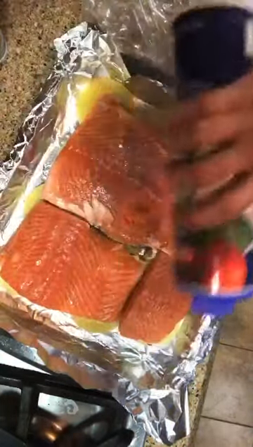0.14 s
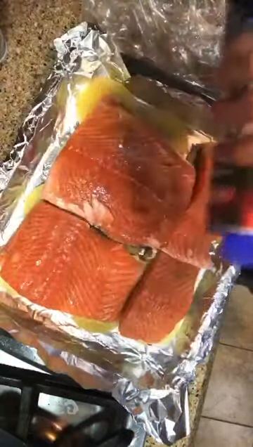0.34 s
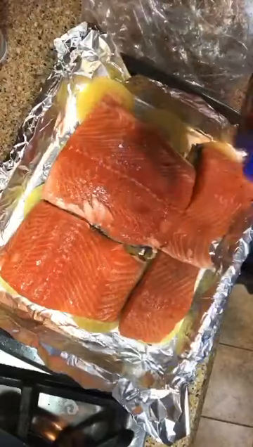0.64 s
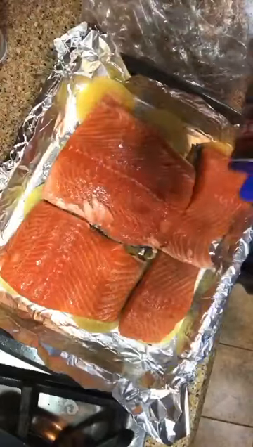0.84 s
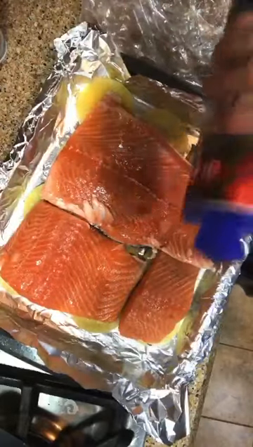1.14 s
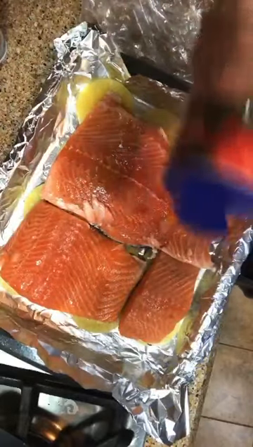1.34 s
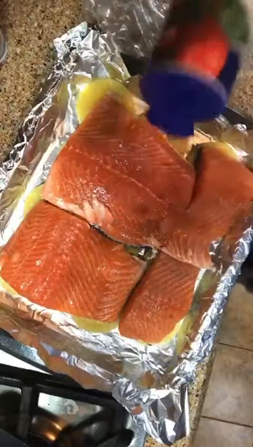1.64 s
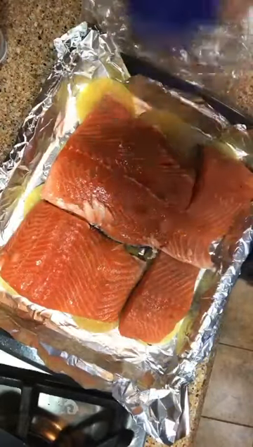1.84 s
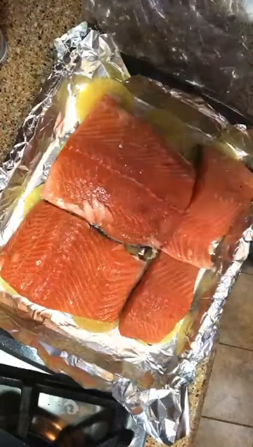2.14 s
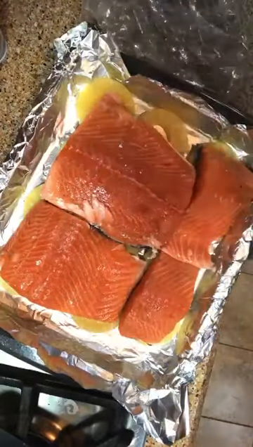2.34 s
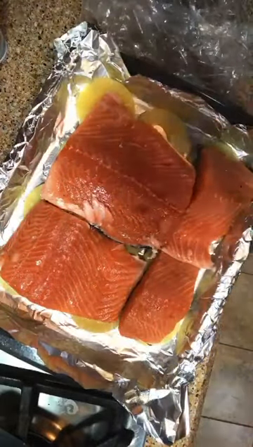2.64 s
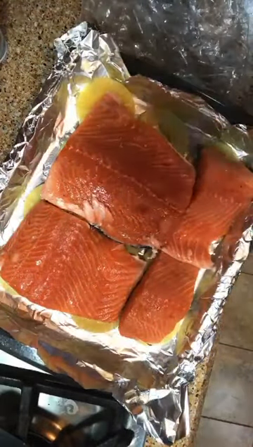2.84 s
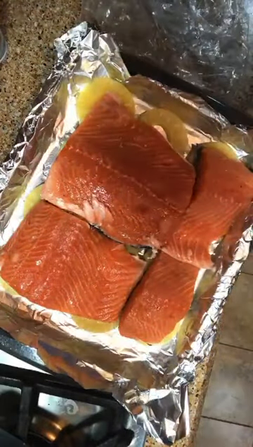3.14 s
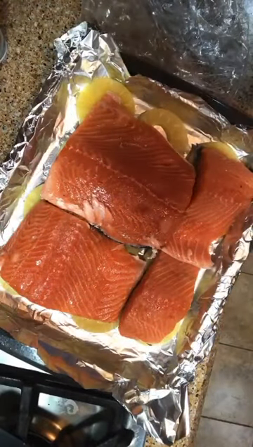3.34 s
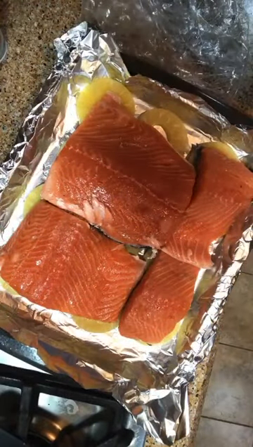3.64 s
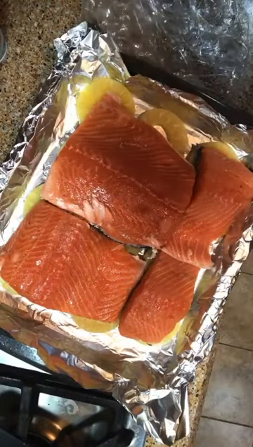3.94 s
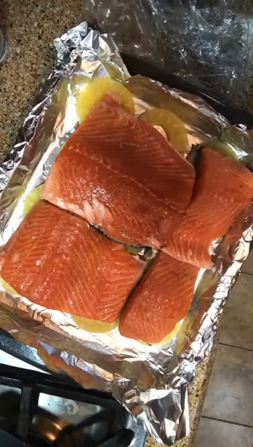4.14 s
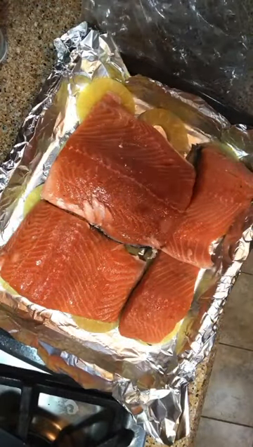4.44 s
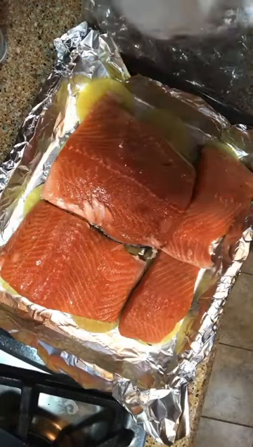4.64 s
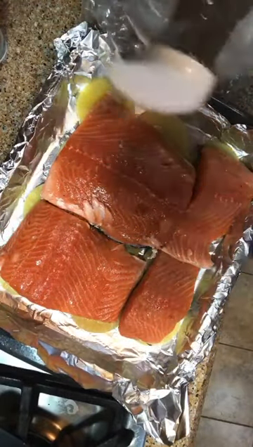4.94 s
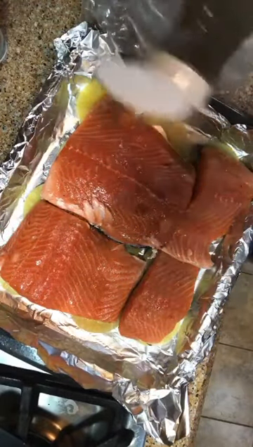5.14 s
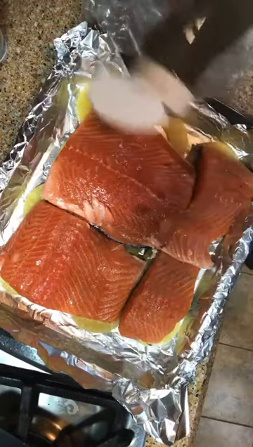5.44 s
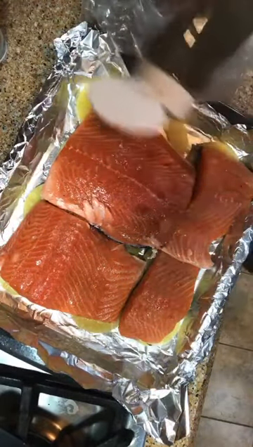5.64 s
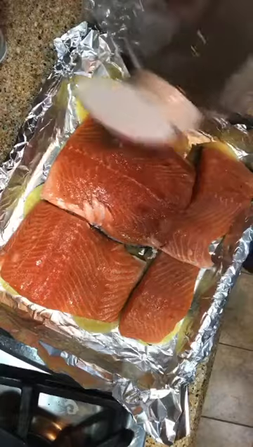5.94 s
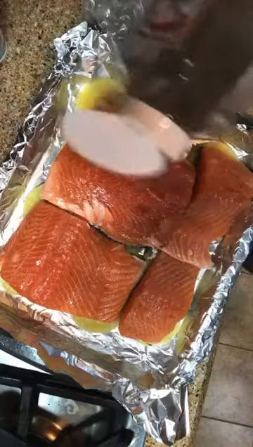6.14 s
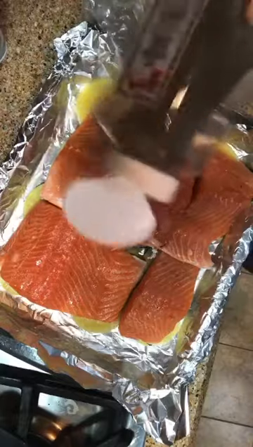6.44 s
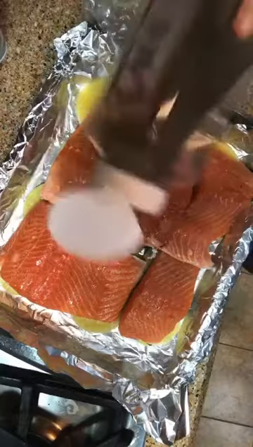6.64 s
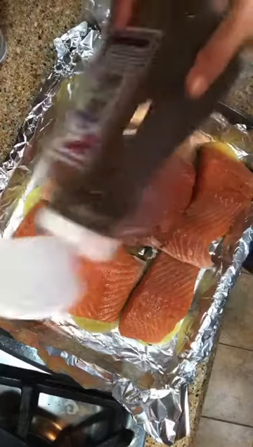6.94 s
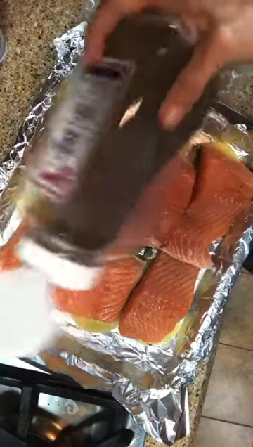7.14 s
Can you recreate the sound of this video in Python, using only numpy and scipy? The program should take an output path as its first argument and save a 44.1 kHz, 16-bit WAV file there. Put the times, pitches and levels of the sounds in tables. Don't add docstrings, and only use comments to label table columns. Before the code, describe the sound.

A nearby phone microphone catches quick, bright salt swishes in pairs for about two seconds, then a hard hollow knock as the tube lands on stone. A box bumps, a metal clip clicks and glass jars clatter with a short ring stilled by a hand. Quiet pepper rustling and light plastic lid flaps follow, then a crisp shake, over fridge hum and half-second tile reverberation.

```python
import sys
import numpy as np
from scipy import signal
from scipy.fft import rfft, irfft, next_fast_len
from scipy.io import wavfile
from scipy.ndimage import uniform_filter1d, map_coordinates

SR = 44100
rng = np.random.default_rng(int(sys.argv[2]) if len(sys.argv) > 2 else 0)


def ratio_of_db(decibels):
    return 10 ** (np.asarray(decibels, float) / 20)


def log_audio(samples):
    frames = np.atleast_2d(samples).T
    limited = np.clip(frames, -1, 1)
    pcm = np.round(limited * 32767).astype(np.int16)
    wavfile.write(sys.argv[1], SR, pcm)


N = 321489

# peak_s, level_db, half_length_s
SALT_THROWS = [(0.067, -53, 0.082), (0.146, -50.5, 0.073), (0.284, -56.5, 0.081), (0.355, -53, 0.089),
               (0.567, -55, 0.077), (0.726, -54, 0.073), (0.808, -52, 0.086), (1.005, -53.5, 0.071),
               (1.146, -60, 0.078), (1.219, -52, 0.089), (1.397, -57, 0.088), (1.475, -50, 0.074),
               (1.623, -56.5, 0.098), (1.705, -51.5, 0.077), (2.099, -55.5, 0.13)]
# peak_s, level_db, rise_s, fall_s
SALT_JOLT = [
    (0.453, -52.5, .006, 0.15),
]
# peak_s, level_db, rise_s, fall_s, fine_crystals_db
SALT_SLIDES = [
    (0.965, -57.5, .17, .17, -0.5),
    (1.53, -67.5, 0.15, 0.24, -3),
    (2.42, -65, .2, .35, -2.5),
    (2.25, -71, 0.089, 0.31, 4),
]
# peak_s, level_db, rise_s, fall_s
PEPPER_THROWS = [(3.45, -63.5, 0.0082, .1), (3.526, -57, 0.058, .1), (3.572, -52.5, 0.045, 0.13),
                 (5.116, -55.5, .04, 0.096), (5.566, -62, .012, .15), (6.736, -47, .005, .05),
                 (6.755, -45, 0.027, 0.04), (6.79, -57, .03, 0.097), (7.29, -68, .05, .05)]
# peak_s, level_db, rise_s, fall_s, fine_grains_db
PEPPER_SLIDES = [(4.2, -61, 0.22, .2, 0), (4.26, -65.5, 0.11, 0.13, 2), (4.62, -63.5, 0.24, 0.25, -4.5),
                 (4.75, -63.5, 0.28, 0.12, 1.5), (4.87, -70, 0.1, 0.17, 3), (5.02, -65.5, 0.038, 0.4, 0.5),
                 (5.2, -69.5, 0.22, 0.24, 2.5), (5.43, -75, 0.064, 0.18, 2), (5.64, -70.5, 0.12, 0.13, -8),
                 (5.75, -70, .03, 0.095, 4.5), (5.83, -63, 0.22, 0.18, -2.5), (6.08, -79, 0.18, 0.079, 1.5),
                 (6.28, -76, .1, .1, 1.5), (6.63, -75, .1, .1, 1.5), (5.57, -68, .01, .06, -8),
                 (6.4, -60.5, 0.071, 0.12, -4), (6.475, -63, 0.045, 0.15, -1),
                 (6.93, -65.5, 0.14, 0.16, -6), (7.03, -69, 0.12, 0.15, 0), (7.2, -74.5, 0.26, .2, -4)]
# frequency_hz, density_db_per_hz
SALT_HISS = [(3000, -19.5), (5000, -8), (6500, -3.5), (8500, -6.5), (10500, -4), (12500, -5.5), (14100, -6),
             (15300, -4), (16000, -37)]
# frequency_hz, density_db_per_hz
PEPPER_HISS = [(3000, -31), (5000, -4), (6300, -4), (8000, -3), (10400, -0.5), (12500, -6), (15000, -2.5),
               (16000, -9)]
# frequency_hz, density_db_per_hz
WALL_RUB = [(500, -10.5), (1000, -1.5), (1700, 1), (2500, -2), (4000, -25)]
# frequency_hz, density_db_per_hz
COARSE_GRAINS = [(1600, -31), (2700, -4), (3600, -2.5), (5000, -7.5), (7500, -17)]
# pitch_hz, width_hz, level_db
SALT_CAP = [(4270, 930, -2.5), (6500, 500, 0), (13900, 1000, -1)]
# pitch_hz, width_hz, level_db
PEPPER_CAP = [(2880, 180, -11), (5230, 130, 1.5), (6550, 69, -4.5), (7800, 180, -2), (11270, 900, -4),
              (14100, 300, 1)]
# start_s, peak_db, length_s, cap_pitch_hz, cap_level_db
CAP_TICKS = [(0.2872, -33, 0.0086, 14200, 11), (0.361, -40, 0.013, 6520, -7), (0.45, -40, 0.016, 12900, 6),
             (0.453, -49, 0.012, 14800, 0), (0.4662, -42, 0.012, 13800, 3), (0.4986, -35, 0.008, 6450, -6),
             (0.45, -44.5, 0.012, 3100, 8), (0.501, -52, 0.015, 3300, 8), (6.7335, -52, 0.01, 2970, 12),
             (0.954, -38, 0.014, 14500, 0.5), (5.1103, -44, 0.026, 5250, -10),
             (5.567, -55, 0.03, 13800, 10), (6.733, -33, 0.011, 6550, -10),
             (6.7444, -36, 0.017, 11500, 6.5)]

# start_s, peak_db, crack_db
TUBE_DOWN = [
    (2.433, -12.5, 0),
]
BOX_NUDGE = [
    (3.171, -24.5, -28),
    (3.175, -23, -21),
    (3.219, -38, -13),
    (3.268, -51, -22),
]
SPRING_CLICK = [
    (3.26, -45.5, 6.1),
]
JAR_TOUCH = [
    (3.444, -32.5, -22),
    (3.449, -25.5, -8),
]
JAR_CLINK = [
    (3.604, -15, -22),
    (3.607, -21, -28),
    (3.636, -20.5, -32),
    (3.67, -13.5, -17),
    (3.711, -18, -18),
]
LID_FLAP = [(4.157, -46.5, -26), (4.377, -45, -30), (4.386, -38, -30), (4.406, -43, -30), (4.549, -40, -30),
            (4.557, -41, -30), (4.576, -42, -30)]
LID_SWING = [
    (6.472, -46, -26),
    (6.479, -40, -30),
]

# pitch_hz, width_hz, level_db
TUBE_BODY = [(252, 72, -5.5), (352, 52, 1), (740, 160, -5), (1010, 150, 1.5), (1780, 350, -11.5)]
BOX_BODY = [(362, 23, 1.5), (746, 156, -7), (1354, 180, -5), (1900, 320, -8.5), (2450, 620, -16.5),
            (5240, 40, -20)]
SPRING_BODY = [(4230, 190, 5), (5400, 270, -9)]
JAR_BASE = [(354, 31, 0), (520, 72, -3.5), (960, 380, -8), (1400, 260, -5), (2030, 360, -8.5),
            (2650, 850, -21)]
JAR_BODY = [(333, 62, -10.5), (537, 42, -10.5), (735, 130, -9.5), (1080, 560, -7), (1474, 300, -2.5),
            (2125, 186, -9), (2970, 540, -16.5)]
LID_BODY = [(814, 130, -6), (1010, 170, 4.5), (1500, 260, -6), (2050, 300, -9)]
LID_HANGING = [(870, 160, 6), (1080, 200, -1.5), (1750, 600, -6)]
HARD_EDGE = [(2800, 1960, 7), (7000, 2500, -10.5), (13000, 5000, -23)]

# start_s, level_db, upper_modes_db
GLASS_RINGS = [
    (3.448, -44.5, -5.5),
    (3.604, -31, -9),
    (3.67, -35.5, -7),
    (3.711, -40, -7.5),
]
# pitch_hz, level_db, t60_s
GLASS_MODES = [(756.4, -6.5, 0.41), (955, -15.5, 0.56), (1120, -7.5, 0.42), (1296, -5, 0.54),
               (1513, -11, 0.56), (1619, -1.5, 0.62), (1628, -6.5, 0.52), (3710, -3, 0.4),
               (3760, -12, 0.52), (6620, -26, 0.29)]
# start_s, peak_db, pitch_hz, t60_s
METAL_PINGS = [
    (3.175, -61, 5216, .13),
    (3.176, -63, 4118, .2),
    (3.26, -64, 4300, .2),
    (3.449, -63, 5911, 0.18),
]
# start_s, peak_db, pitch_hz, t60_s
COUNTER_THUDS = [(2.4345, -15, 180, 0.06), (2.4345, -20, 245, 0.06), (2.458, -28, 170, .08),
                 (2.555, -33, 180, .08), (2.51, -24.5, 179, 0.045), (3.215, -38.5, 132, 0.049),
                 (3.266, -34, 133, 0.086), (3.45, -29, 197, 0.08), (3.487, -44, 168, 0.11),
                 (3.536, -40.5, 135, 0.065), (3.611, -31.5, 151, 0.091), (3.675, -32.5, 162, 0.1),
                 (3.72, -37, 138, 0.064), (2.436, -31.5, 100, 0.19)]
# frequency_hz, t60_s
ROOM_DECAY = [(100, 0.51), (400, 0.48), (1500, 0.56), (5000, 0.52), (12000, 0.51)]
# pitch_hz, level_db_rms
FRIDGE_HUM = [(32, -67.5), (60, -69.5), (120, -63), (240, -77), (752, -78), (960, -79.5)]
# frequency_hz, density_db_per_hz
ROOM_TONE = [(20, -3.5), (63, -2.5), (85, -11), (125, -12.5), (170, -16), (300, -16), (450, -19.5),
             (760, -21), (2000, -26.5), (4000, -33), (8000, -38.5), (10500, -41.5), (13500, -39),
             (16000, -44)]
# frequency_hz, level_db
MIC_COLOUR = [(9000, 0), (10400, -5), (11800, -1.5)]


def unit(x):
    return x / np.sqrt(np.mean(x ** 2) + 1e-20)


def along(points, hz):
    f, value = np.transpose(points)
    return np.interp(np.log(hz + 1), np.log(f + 1), value)


def wobble(rate_hz):
    at = np.arange(0, N + 32, 32)
    knots = rng.standard_normal(int(N * rate_hz / SR) + 4)
    return np.interp(np.arange(N), at, map_coordinates(knots, [at * rate_hz / SR]))


def filtered(x, response):
    size = next_fast_len(len(x) + 8192)
    spectrum = rfft(x, size) * response(np.fft.rfftfreq(size, 1 / SR))
    return irfft(spectrum, size)[:len(x)]


def coloured(x, spectrum):
    return unit(filtered(x, lambda hz: ratio_of_db(along(spectrum, hz))))


def body(x, modes):
    def response(f):
        total = 0
        for k, (hz, width, db) in enumerate(modes):
            damping = 1j * f * width
            total = total + (-1) ** k * ratio_of_db(db) * damping / (hz * hz - f * f + damping)
        return total
    return filtered(x, response)


def room(x, early_db, wet_db, direct_db=0.0):
    hz, t, z = signal.stft(rng.standard_normal(SR // 2 + SR // 8), SR, nperseg=256)
    decay = ratio_of_db(-60 * t / along(ROOM_DECAY, hz)[:, None])
    tail = signal.istft(z * decay, SR, nperseg=256)[1]
    t = np.arange(len(tail)) / SR
    tail = tail * (1 - np.exp(-t / 0.012))
    early = rng.standard_normal(len(t)) * ratio_of_db(-60 * t / 0.045) * (1 - np.exp(-t / 0.0011))
    echoes = ratio_of_db(early_db) * early / np.linalg.norm(early) + ratio_of_db(wet_db) * tail / np.linalg.norm(tail)
    return ratio_of_db(direct_db) * x + signal.fftconvolve(x, echoes)[:len(x)]


def add(track, s, x):
    part = track[round(s * SR):][:len(x)]
    part += x[:len(part)]


def shaking():
    rise_share = 0.48
    throws = [(s, db, rise_share * 2 * half, (1 - rise_share) * 2 * half) for s, db, half in SALT_THROWS]
    salt = powder(throws + SALT_JOLT, SALT_SLIDES, SALT_HISS, SALT_CAP, clump_db=0.5, patchy_db=2.0,
                  cap_db=-10.5, wall_db=[-16, 1.5], coarse_db=[-10.5, 0.5])
    pepper = powder(PEPPER_THROWS, PEPPER_SLIDES, PEPPER_HISS, PEPPER_CAP, clump_db=-0.5, patchy_db=2.5,
                    cap_db=-1.5, wall_db=[-17, 2.5], coarse_db=[-9, 1.5])
    return salt + pepper


def powder(throws, slides, hiss, cap, clump_db, patchy_db, cap_db, wall_db, coarse_db):
    grains = rng.standard_normal((3, N)) * ratio_of_db(1.5 * rng.standard_exponential((3, N)))
    z = signal.stft(grains * ratio_of_db(clump_db * wobble(150)), nperseg=256)[2]
    patches = uniform_filter1d(rng.standard_normal(z.shape), size=9, axis=1)
    patches = uniform_filter1d(patches, size=8, axis=2)
    grains = signal.istft(z * ratio_of_db(patchy_db * unit(patches)), nperseg=256)[1][:, :N]
    fine = coloured(grains[0], hiss)
    wall = coloured(grains[1], WALL_RUB)
    coarse = coloured(grains[2], COARSE_GRAINS)

    thrown = strokes(throws)
    slid = strokes([row[:-1] for row in slides])
    sifted = strokes([(s, db + fine_db, rise, fall) for s, db, rise, fall, fine_db in slides])

    def level(share_db):
        return np.sqrt(ratio_of_db(2 * share_db[0]) * thrown + ratio_of_db(2 * share_db[1]) * slid)

    ringing = ratio_of_db(cap_db) * np.sqrt(thrown) * unit(body(grains[0] + grains[1], cap))
    return np.sqrt(thrown + sifted) * fine + ringing + level(wall_db) * wall + level(coarse_db) * coarse


def strokes(rows):
    pointed = 1.19
    t = np.arange(0, N / SR + .002, .001)
    s, db, rise, fall = np.transpose(rows)[..., None]
    away = np.abs(t - s) / np.maximum(np.where(t < s, rise, fall), .002)
    power = np.sum(ratio_of_db(db - 20 * away ** pointed) ** 2, axis=0)
    return np.interp(np.arange(N) / SR, t, power)


def ticks():
    out, t = np.zeros(N), np.arange(SR // 10) / SR
    for s, db, length, hz, cap_db in CAP_TICKS:
        burst = coloured(rng.standard_normal(len(t)), SALT_HISS)
        burst += ratio_of_db(cap_db) * unit(body(rng.standard_normal(len(t)), [(hz, 0.18 * hz, 0)]))
        envelope = ratio_of_db(db - 1.5 - 60 * t / max(length, .002)) * (1 - np.exp(-t / 0.0012))
        add(out, s, envelope * burst)
    return out


def knocks(events, modes, contact_s, direct_db, early_db, wet_db):
    out, t = np.zeros(N), np.arange(SR // 2 + SR // 8) / SR
    push = np.exp(-((t - 3 * contact_s) / contact_s) ** 2)
    shell = body(push, modes)
    shell = shell / np.abs(shell).max()
    crack = body(1.0 * (t == 0), HARD_EDGE)
    crack = crack / np.abs(crack).max()
    for s, db, crack_db in events:
        add(out, s, ratio_of_db(db) * room(shell + ratio_of_db(crack_db) * crack, early_db, wet_db, direct_db))
    return out


def objects():
    hits = knocks(TUBE_DOWN, TUBE_BODY, contact_s=.0001, direct_db=-2, early_db=-1.0, wet_db=-3.5)
    hits += knocks(BOX_NUDGE, BOX_BODY, contact_s=.00006, direct_db=-9.5, early_db=2.5, wet_db=-0.5)
    hits += knocks(SPRING_CLICK, SPRING_BODY, contact_s=.00003, direct_db=-2.0, early_db=2.5, wet_db=-5.0)
    hits += knocks(JAR_TOUCH, JAR_BASE, contact_s=.00008, direct_db=-3, early_db=1.5, wet_db=-1.0)
    hits += knocks(JAR_CLINK, JAR_BODY, contact_s=.00008, direct_db=-3.5, early_db=-1.0, wet_db=-2.5)
    hits += knocks(LID_FLAP, LID_BODY, contact_s=.00013, direct_db=-6, early_db=-2.5, wet_db=0.0)
    hits += knocks(LID_SWING, LID_HANGING, contact_s=.00013, direct_db=-5, early_db=-2.5, wet_db=-1.5)
    return hits


def glass():
    grip_s, grip_t60_s = 3.79, .15
    out, t = np.zeros(N), np.arange(SR) / SR
    for s, db, upper_db in GLASS_RINGS:
        upper = upper_db - 60 * np.maximum(s + t - grip_s, 0) / grip_t60_s
        ring = np.zeros(len(t))
        for hz, level, t60 in GLASS_MODES:
            fade_db = level + upper * (hz > 3000) - 60 * t / t60
            ring += ratio_of_db(fade_db) * np.sin(2 * np.pi * hz * t)
        add(out, s, ratio_of_db(db) * (1 - np.exp(-t / 0.0029)) * ring)
    return out


def pings():
    out, t = np.zeros(N), np.arange(SR // 2) / SR
    for s, db, hz, t60 in METAL_PINGS:
        add(out, s, ratio_of_db(db - 60 * t / t60) * (1 - np.exp(-t / 0.0023)) * np.sin(2 * np.pi * hz * t))
    return out


def counter():
    out, t = np.zeros(N), np.arange(SR // 2) / SR
    for s, db, hz, t60 in COUNTER_THUDS:
        swing = ratio_of_db(db - 60 * t / t60) * (1 - np.exp(-t / 0.00087)) * np.sin(2 * np.pi * hz * t)
        add(out, s, room(swing, early_db=-7.5, wet_db=-8.5))
    return out


def kitchen():
    t, hum = np.arange(N) / SR, np.zeros(N)
    for hz, db in FRIDGE_HUM:
        level = ratio_of_db(db + 3 + 1.5 * wobble(8))
        hum += level * np.sin(2 * np.pi * hz * t + .3 * wobble(3))
    air_db = -56.5 - 3.0 + .6 * wobble(3)
    return hum + ratio_of_db(air_db) * coloured(rng.standard_normal(N), ROOM_TONE)


def scene():
    powders = shaking() + room(ticks(), early_db=-5, wet_db=-7)
    mix = powders + objects() + glass() + pings() + counter() + kitchen()
    return mix[None]


def low_pass(x):
    return signal.sosfilt(signal.butter(12, 16500, fs=SR, output="sos"), x)


def record(dry):
    soft = dry[0] / (1 + np.abs(dry[0] / .27) ** 4) ** (1 / 4)
    mix = filtered(soft, lambda hz: ratio_of_db(along(MIC_COLOUR, hz)) * (hz < 15830))
    return low_pass(mix[None])


dry = scene()
out = record(dry)
log_audio(out)
```